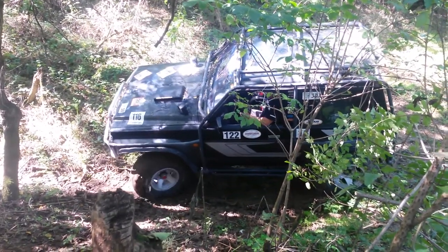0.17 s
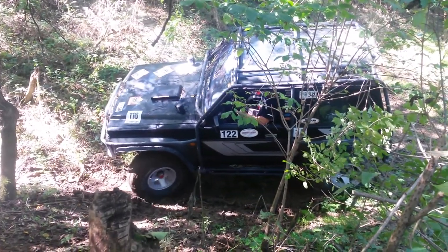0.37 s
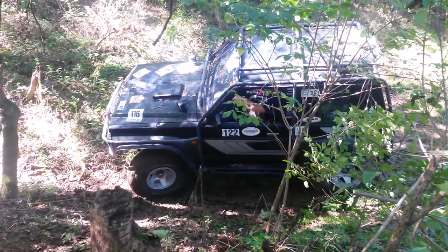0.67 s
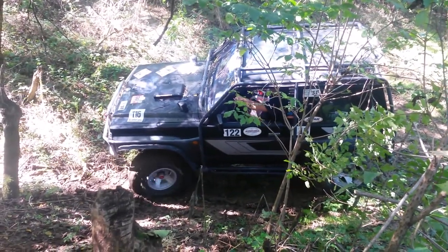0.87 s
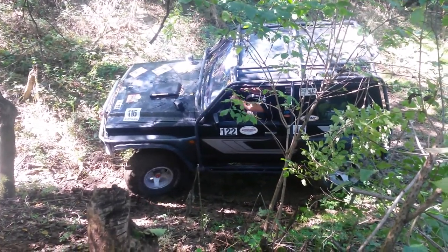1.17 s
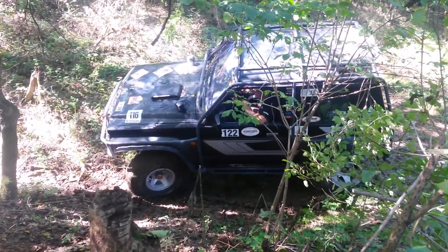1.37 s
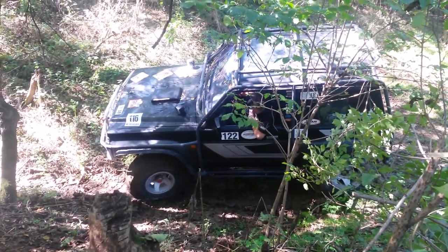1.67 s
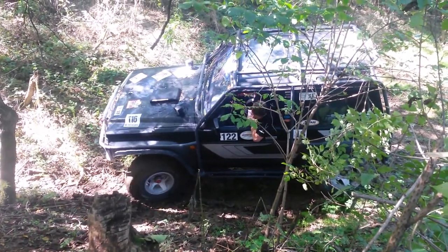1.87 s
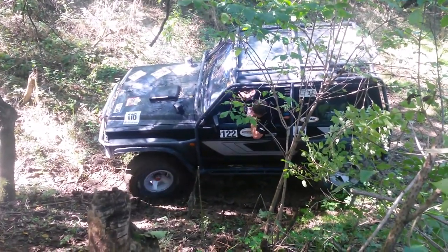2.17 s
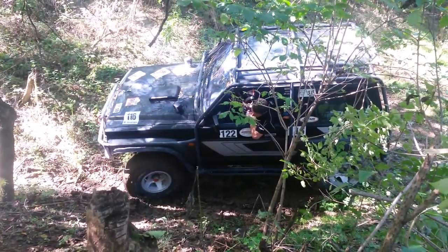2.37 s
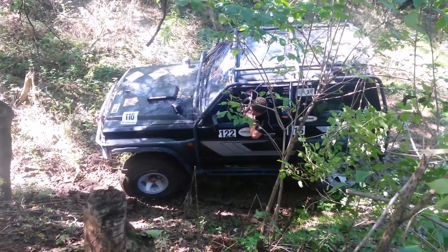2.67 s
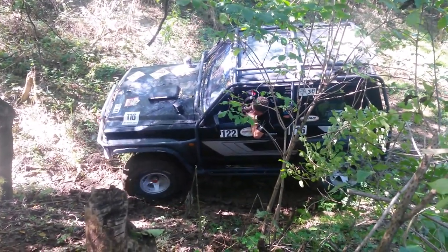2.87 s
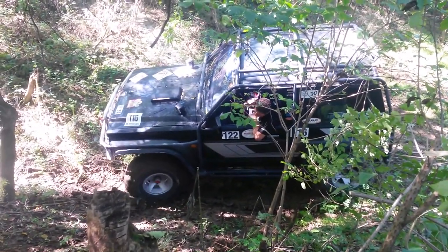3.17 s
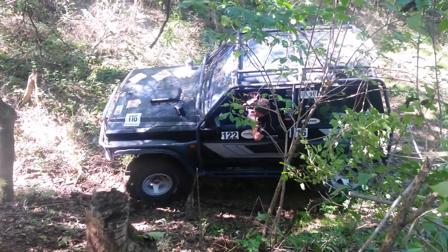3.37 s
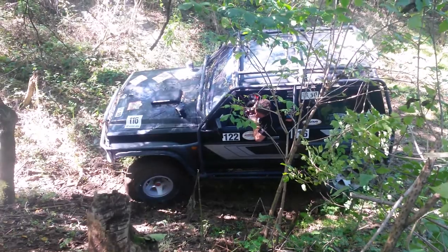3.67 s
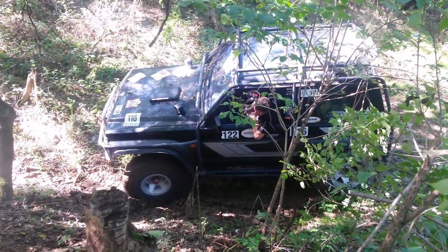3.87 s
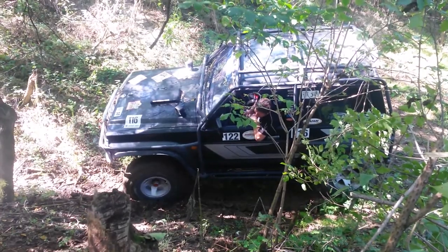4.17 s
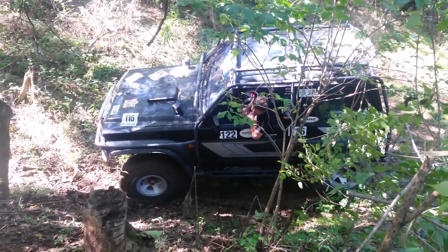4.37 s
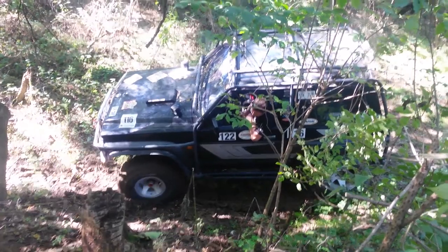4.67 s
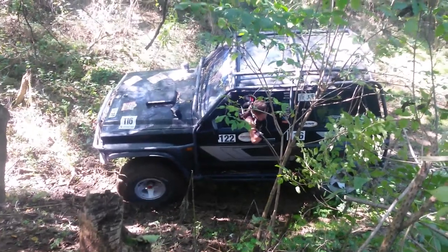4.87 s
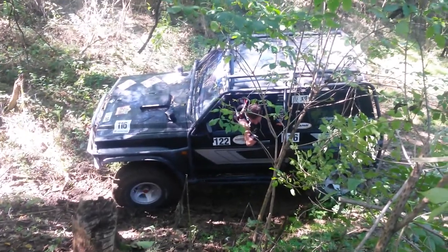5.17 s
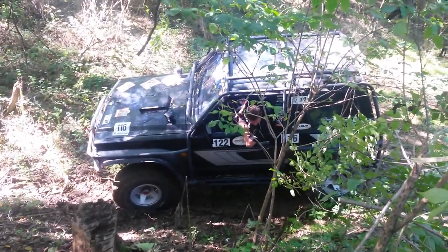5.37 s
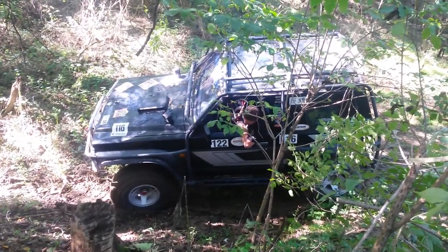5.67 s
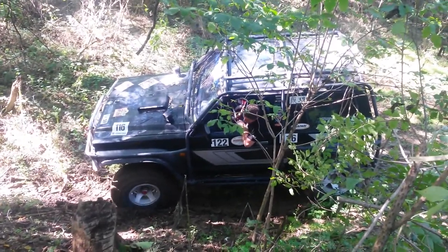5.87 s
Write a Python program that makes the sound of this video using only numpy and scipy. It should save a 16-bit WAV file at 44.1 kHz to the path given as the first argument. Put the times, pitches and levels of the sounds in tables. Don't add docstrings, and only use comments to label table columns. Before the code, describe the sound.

Close diesel engine revs up, sags, then climbs steadily with a piercing turbo whistle, metallic clatter and airy hiss, easing off at the end.

```python
import sys
import numpy as np
from scipy import signal
from scipy.fft import rfft, irfft, next_fast_len
from scipy.io import wavfile
from scipy.ndimage import uniform_filter1d, map_coordinates

SR = 44100
rng = np.random.default_rng(int(sys.argv[2]) if len(sys.argv) > 2 else 0)


def voltage_ratio(level):
    return 10 ** (np.asarray(level, float) / 20)


def master(y):
    cut = np.clip(np.atleast_2d(y).T, -1, 1)
    pcm = np.round(cut * 32767)
    wavfile.write(sys.argv[1], SR, pcm.astype(np.int16))


N = 265129

# [t/s, f/Hz, level/dB]
FIRING = [(0.0, 104.7, -16.5), (0.13, 115.2, -16.5), (0.25, 122, -11.5), (0.44, 133.7, -12.5),
          (0.57, 139.9, -14.5), (0.84, 133.4, -15.5), (1.12, 125.1, -15), (1.61, 115.3, -16),
          (2.0, 116.2, -15.5), (2.31, 121.2, -12.5), (2.55, 121.4, -13), (3.0, 125.3, -11.5),
          (3.25, 125.8, -14), (4.45, 131.1, -12.5), (5.19, 128.5, -12.5), (5.7, 129.5, -12.5),
          (5.86, 119.4, -13.5), (6.01, 101.2, -23.5)]
# [t/s, level/dB]
EFFORT = [(0.0, 1.5), (0.37, 3), (0.79, -2), (1.1, -3), (1.49, -0.5), (1.72, 1), (3.05, 1), (3.26, -0.4),
          (4.55, 0.75), (4.85, -0.7), (5.45, 2), (5.75, -.5), (6.01, -3.5)]
# [multiple of the engine cycle rate, level/dB]
UNEVEN_TONES = [(2, -29), (4, 5.5), (5, 1.5), (7, -14.5), (8, -1), (9, -2), (10, -16.5), (11, -4.5),
                (14, -23), (15, -16.5), (16, -22), (17, -9.5), (18, -13.5), (19, -27), (24, -28)]
# [f/Hz, level/dB]
EXHAUST_PIPE = [(60, -42), (125, 6.5), (155, 8), (185, -5), (225, 2), (260, -8), (500, 2)]
# [f/Hz, level/dB per Hz]
ENGINE_NOISE_SPECTRUM = [(30, -14), (60, -9), (110, -2), (160, -1),
                         (200, -1.5), (300, -3.5), (370, -11.5), (455, -17.5), (600, -10.5), (800, -10),
                    (1200, -7.5), (1650, -9), (2050, -12), (2400, -12), (3000, -16.5), (3600, -23),
                    (4300, -26.5), (5500, -22)]
# [f/Hz, width/Hz, level/dB]
RINGING_PANELS = [(385, 16, -2.5), (579, 41, -7), (749, 24, 1), (858, 78, -16.5), (987, 87, -10),
                  (1497, 44, -4), (1928, 36, -7.5), (2196, 30, -7.5), (2320, 40, -5), (2450, 39, 1),
                  (2863, 48, 1), (3087, 100, 0), (3430, 520, -6)]
# [t/s, f/Hz, level/dB, left minus right/dB]
WHISTLE = [(0.0, 5560, -32, -1), (0.18, 6030, -26, 0.5), (0.4, 6720, -24.5, 4), (0.5, 7300, -23, -2),
           (0.65, 7600, -21, -3), (0.77, 7700, -26, -1), (1.1, 7610, -25.5, 0.5), (1.31, 7420, -25.5, -4),
           (1.5, 7090, -25, 4), (1.85, 6770, -28, 3.5), (2.68, 7078, -24, 4.5), (2.85, 7165, -23.5, -1.5),
           (3.75, 7503, -20.5, -1.5), (4.15, 7557, -20, -5.5), (4.85, 7815, -22, -5), (5.26, 7634, -21, -1),
           (5.72, 7630, -22.5, -2.5), (6.01, 6950, -25, 4)]
# [left delay/s, right delay/s, level/dB]
WHISTLE_ECHOES = [(.0013, 0.002, 0.5), (.0041, 0.0029, -9), (.0092, 0.014, 0), (.0131, 0.016, -6),
                  (0.0184, 0.017, 5.5), (.0236, 0.017, -6), (.029, 0.027, -24), (0.048, .052, -35),
                  (0.067, 0.074, 3.5)]
# [f/Hz, level/dB per Hz]
HISS_SPECTRUM = [(3500, -9), (4500, -3.5), (5500, -3.5), (6500, 2.5), (7800, 6), (9000, -7), (10700, -5),
                 (11800, -17.5), (13000, -24), (14500, -12)]
# [t/s, peak level/dB, ring f/Hz, crack level/dB, left minus right/dB]
TWIG_SNAPS = [(.055, -28, 950, -20, 1), (.11, -9, 2600, -18, 3), (0.116, -27, 1060, -25, -1),
              (0.199, -12, 1305, -18, 7), (0.214, -16, 3640, -25, 0), (0.282, -12.5, 2830, -20, 4),
              (0.31, -13, 1036, -25, -1), (.357, -17, 2333, -15, 8), (0.3924, -19, 385, 11.5, 1),
              (0.4, -12.5, 2850, -5, -2), (.49, -18, 3690, -12, -2), (0.574, -12.5, 983, -20, 9),
              (0.592, -16, 2860, -25, 0), (1.924, -21, 5630, 7.5, 0), (2.371, -15.5, 880, -18, 5),
              (2.42, -17, 2470, -20, 6), (2.614, -18.5, 2320, -22, 10)]
# [start t/s, end t/s, rattle level rise/dB]
ROUGH_GROUND = [
    (0.0, 0.699, 6.5),
    (2.095, 3.251, 0.5),
]
# [f/Hz, share 0 to 1]
SHARED_SOUND = [(125, 1), (300, .96), (600, .85), (1000, .62), (2500, .62), (3300, .3), (5000, .25),
                (9000, .1), (14000, .03)]
# [f/Hz, phase/radians]
LEFT_LEAD = [(100, 0), (800, 0), (1300, -.4), (1800, -1.5), (2800, -1.6), (5000, -1.5)]
# [f/Hz, left minus right/dB]
LEFT_RIGHT_TILT = [(60, 1.2), (350, .6), (700, 3), (1000, 5.5), (1500, 10), (2600, 8.5), (3300, 1.5),
                   (4000, -2), (6500, 1), (8500, -5), (15000, -5)]
# [t/s, level/dB, half length/s]
GAIN_DIPS = [
    (0.383, -8, 0.01),
    (1.7, -4.5, 0.017),
    (1.467, -2.5, 0.054),
]


def rms_one(x):
    return x / np.sqrt(np.mean(x ** 2) + 1e-20)


def in_time(rows):
    s, *columns = np.transpose(rows)
    return [np.interp(np.arange(N) / SR, s, column) for column in columns]


def at_hz(points, hz):
    table_hz, values = np.array(points)[:, 0], np.array(points)[:, 1]
    return np.interp(np.log(hz), np.log(np.maximum(table_hz, 1)), values)


def drift(rate_hz):
    r = np.exp(-16 * np.pi * rate_hz / SR)
    white = rng.standard_normal(N // 8 + 8002)
    slow = signal.lfilter([1], [1, -2 * r, r * r], white)[8000:]
    return np.interp(np.arange(N) / 8, np.arange(len(slow)), rms_one(slow - slow.mean()))


def resonance(x, hz, width_hz):
    r = np.exp(-np.pi * width_hz / SR)
    feed = np.array([1, 0, -1]) * (1 - r * r) / 2
    return signal.lfilter(feed, [1, -2 * r * np.cos(2 * np.pi * hz / SR), r * r], x)


def pan(x, left_minus_right_db):
    half_db = left_minus_right_db / 2
    return x * voltage_ratio(np.array([half_db, -half_db]).reshape(2, -1))


def port_noise():
    size = next_fast_len(N)
    hz = np.arange(1, size // 2 + 2) * SR / size
    common, left, right = rfft(rng.standard_normal((3, size)))
    alike = np.clip(at_hz(SHARED_SOUND, hz), 0, 1)
    tilt = voltage_ratio(at_hz(LEFT_RIGHT_TILT, hz) / 2)
    shared, own = np.sqrt(alike), np.sqrt(1 - alike)
    left = tilt * (shared * common * np.exp(1j * at_hz(LEFT_LEAD, hz)) + own * left)
    right = (shared * common + own * right) / tilt
    return irfft([left, right], size)[:, :N]


def banded(spectrum, edges_hz, throb_db, patchy_db):
    out, white = 0, [port_noise(), port_noise()]
    for k, (low, high) in enumerate(zip(edges_hz, edges_hz[1:])):
        band_filter = signal.butter(2, [low, high], "band", fs=SR, output="sos")
        band = signal.sosfilt(band_filter, white[k % 2])
        out = out + band * voltage_ratio(at_hz(spectrum, np.sqrt(low * high)) + patchy_db * drift(9.8))
    return rms_one(out * voltage_ratio(throb_db))


def exhaust(cycle, fire_hz, fire_db, effort_db):
    half_db = -25.5 + effort_db
    uneven_db = -32.5 - 0.19 * (fire_hz - 130) + 0.74 * effort_db
    strong_cylinder = 1.2
    fire = voltage_ratio(fire_db + 0.5 * drift(12)) * np.cos(6 * cycle)
    half = voltage_ratio(half_db + 0.5 * drift(8)) * np.cos(3 * cycle - 0.46)
    uneven = 0
    for k, db in UNEVEN_TONES:
        angle = k * cycle + (k - 6) * strong_cylinder + 0.2 * drift(2)
        tone_db = db + at_hz(EXHAUST_PIPE, k * fire_hz / 6) + 1.5 * drift(2)
        uneven = uneven + voltage_ratio(tone_db) * np.cos(angle)
    return pan(np.sqrt(2) * (fire + half + voltage_ratio(uneven_db) * uneven), 1.34)


def clatter(cycle, effort_db):
    throb_db = 0.76 * np.cos(cycle - 1) + 0.76 * np.cos(6 * cycle) + 1.02 * drift(25)
    edges_hz = 35 * 2 ** np.arange(0, 7.4, 1 / 3)
    noise = banded(ENGINE_NOISE_SPECTRUM, edges_hz, throb_db, patchy_db=0.0)
    rung = 0
    for hz, width_hz, db in RINGING_PANELS:
        rung = rung + voltage_ratio(db + 2.2 * drift(11)) * resonance(noise, hz, width_hz)
    return voltage_ratio(-24.5 + effort_db) * rms_one(noise + 2.52 * rung)


def turbo(cycle):
    hz, level_db, pan_db = in_time(WHISTLE)
    kick = np.cos(3 * cycle + 1.49) + 0.36 * np.cos(6 * cycle + 1.89)
    wander = 0.004 * np.cos(cycle) + 0.003 * drift(80) + 0.0015 * drift(8)
    smooth_hz = uniform_filter1d(hz, size=4500)
    turn = np.cumsum(2 * np.pi * smooth_hz * (1 + 0.027 * kick + wander) / SR)
    swell = voltage_ratio(1.24 * np.cos(3 * cycle - 0.6) + 0.36 * drift(38))
    tone = swell * (np.sin(turn) + voltage_ratio(-38) * np.sin(2 * turn))
    tone += voltage_ratio(-10.5) * drift(280) * np.sin(turn)
    out, now = np.array([tone, -0.5 * tone]), np.arange(N)
    for *delays, db in WHISTLE_ECHOES:
        sway = 2.8 * drift(0.76)
        echo = [map_coordinates(tone, [now - d * SR + sway], order=3, mode="mirror") for d in delays]
        out += voltage_ratio(db) * np.array(echo)
    return pan(rms_one(out) * voltage_ratio(level_db + 3.5), pan_db)


def intake_hiss(cycle, effort_db):
    throb_db = 0.5 * np.cos(3 * cycle) + 0.39 * drift(8.5)
    edges_hz = 3200 * 2 ** np.arange(0, 2.4, 1 / 3)
    return voltage_ratio(-28.5 + 0.97 * effort_db) * banded(HISS_SPECTRUM, edges_hz, throb_db, patchy_db=1.0)


def twigs():
    out, t = np.zeros((2, N + 4000)), np.arange(4000) / SR
    dull = signal.butter(3, 8000, fs=SR, output="sos")
    fade = np.exp(-t / 0.005) + 0.15 * np.exp(-t / 0.02)
    for s, peak_db, hz, crack_db, pan_db in TWIG_SNAPS:
        burst = rng.standard_normal((2, len(t))) * fade
        ring = resonance(burst, hz, 0.034 * hz)
        snap = voltage_ratio(crack_db) * signal.sosfilt(dull, burst) + ring / abs(ring).max()
        start = int(s * SR)
        out[:, start:start + len(t)] += pan(voltage_ratio(peak_db) * snap, pan_db)
    return out[:, :N]


def lurching():
    t, edge_s = np.arange(N) / SR, 0.15
    level_db = -38
    for start, end, rise_db in ROUGH_GROUND:
        level_db = level_db + rise_db * (np.tanh((t - start) / edge_s) - np.tanh((t - end) / edge_s)) / 2
    return level_db


def rattle(level_db):
    sizes = voltage_ratio(3.5 * np.minimum(rng.exponential(1, N), 3)) * rng.choice([-1, 1], N)
    born = rng.random(N) < 900 * voltage_ratio(3 * drift(14)) / SR
    pitches, dealt = np.geomspace(600, 3800, 16), rng.integers(0, 16, N)
    out = 0
    for k, hz in enumerate(pitches):
        clicks = sizes * born * (dealt == k) + 1e-18
        ring = resonance(clicks, hz, 60 + 0.028 * hz)
        out = out + pan(rms_one(ring), at_hz(LEFT_RIGHT_TILT, hz)) * voltage_ratio(-3 * np.log2(hz / 1000))
    return voltage_ratio(level_db) * rms_one(out)


def scene():
    fire_hz, fire_db = in_time(FIRING)
    effort_db, = in_time(EFFORT)
    cycle = np.cumsum(2 * np.pi * uniform_filter1d(fire_hz, size=3000) / 6 / SR)
    engine = exhaust(cycle, fire_hz, fire_db, effort_db) + clatter(cycle, effort_db)
    engine = engine + turbo(cycle) + intake_hiss(cycle, effort_db)
    return engine + twigs() + rattle(lurching())


def roll_off(x):
    return signal.sosfilt(signal.butter(12, 14560, fs=SR, output="sos"), x)


def record(dry):
    t = np.arange(N) / SR
    dip_db = sum(db * np.exp(-((t - s) / half_s) ** 2) for s, db, half_s in GAIN_DIPS)
    mix = 1.6 * np.tanh(voltage_ratio(dip_db) * dry / 1.6)
    return roll_off(mix)


dry = scene()
out = record(dry)
master(out)
```